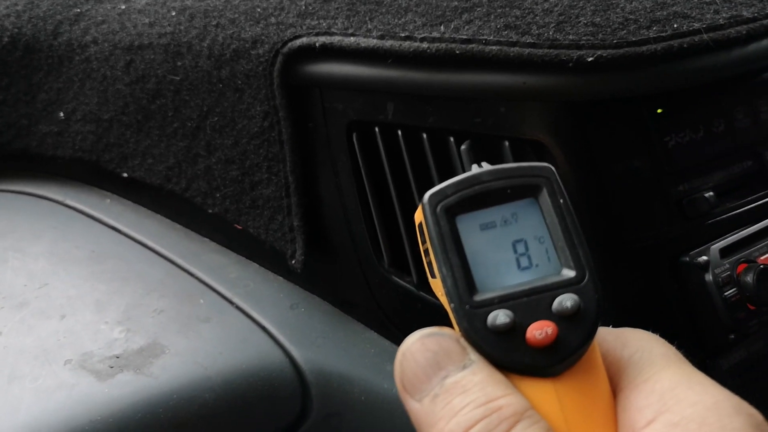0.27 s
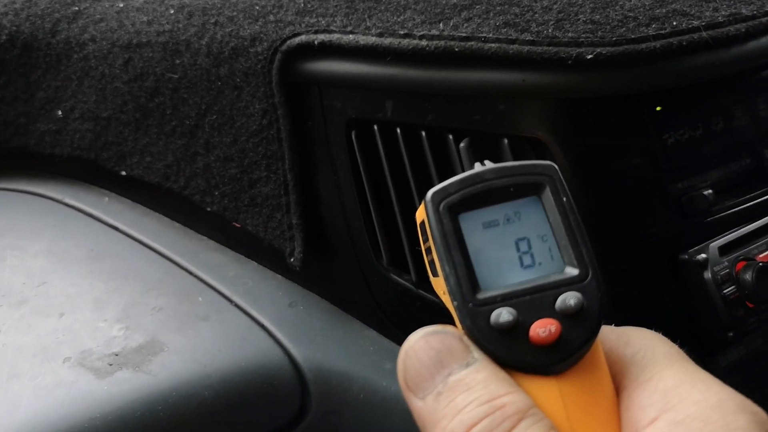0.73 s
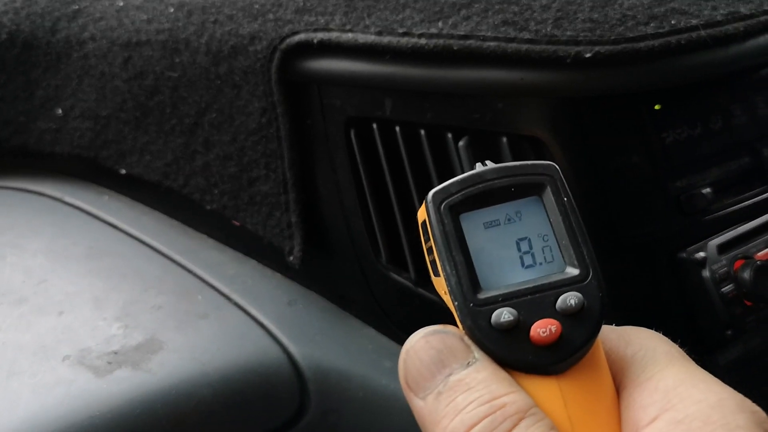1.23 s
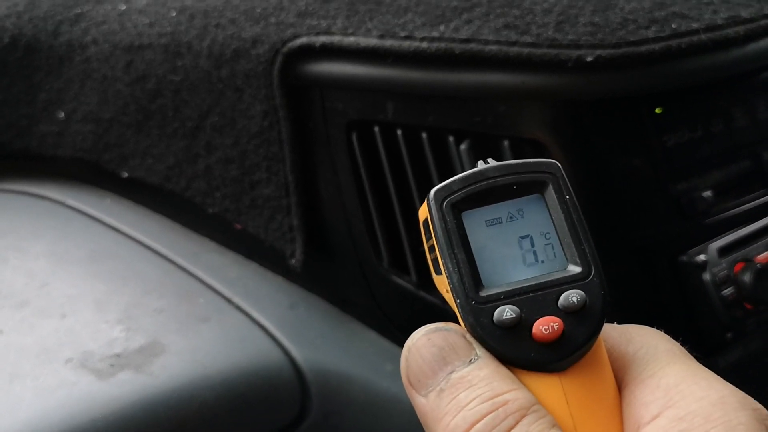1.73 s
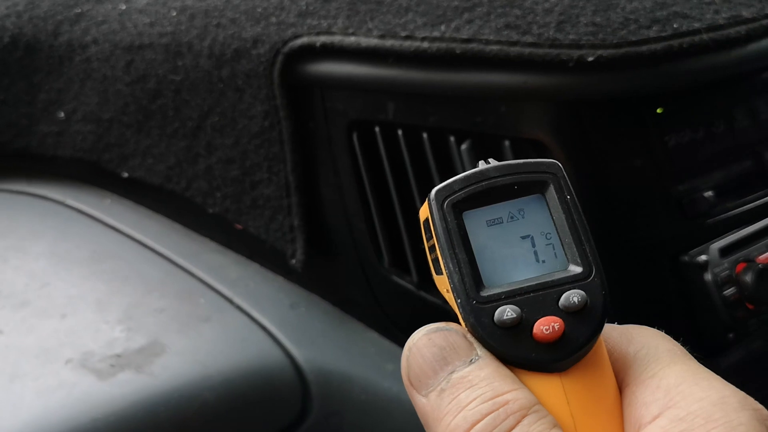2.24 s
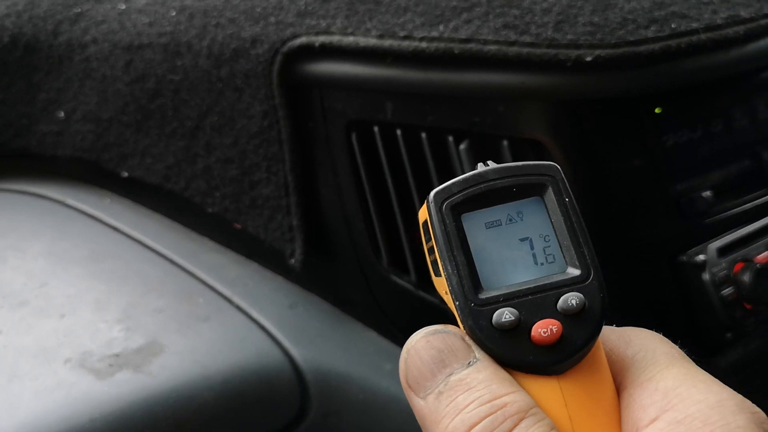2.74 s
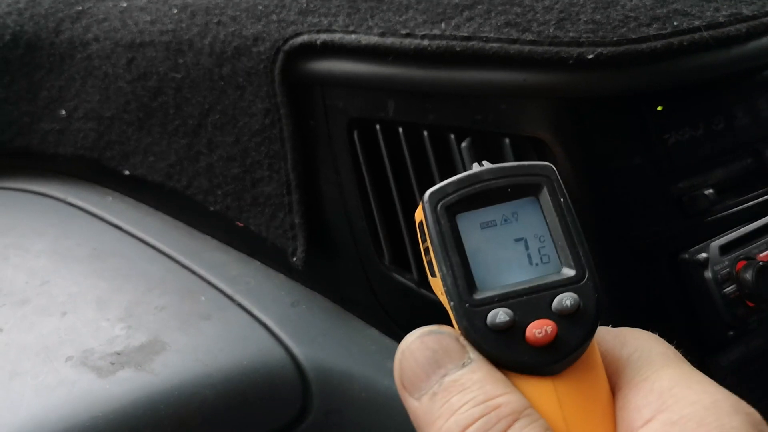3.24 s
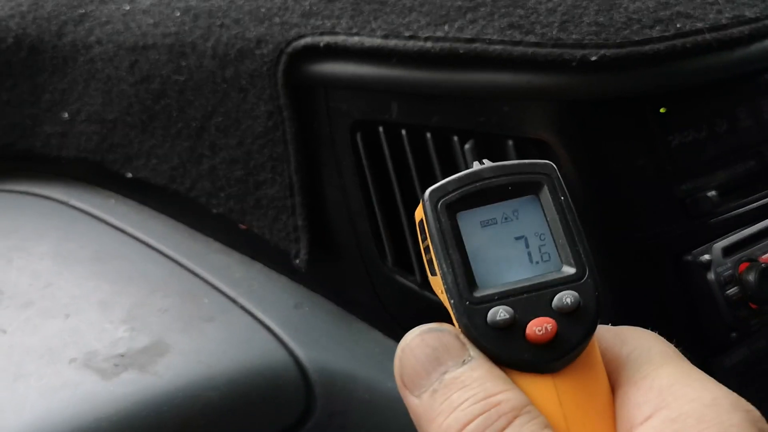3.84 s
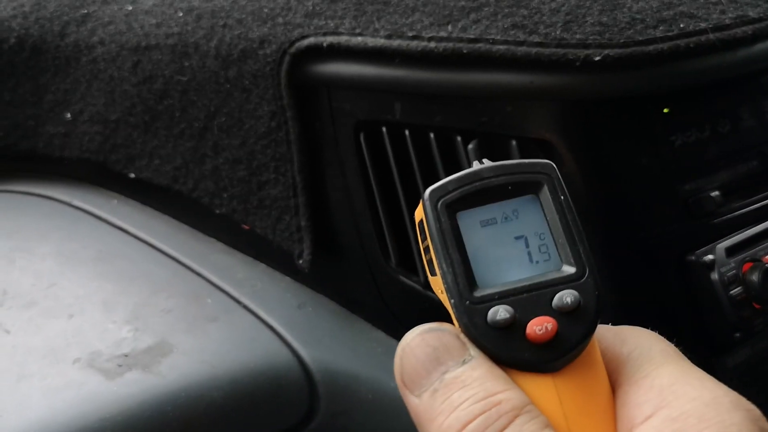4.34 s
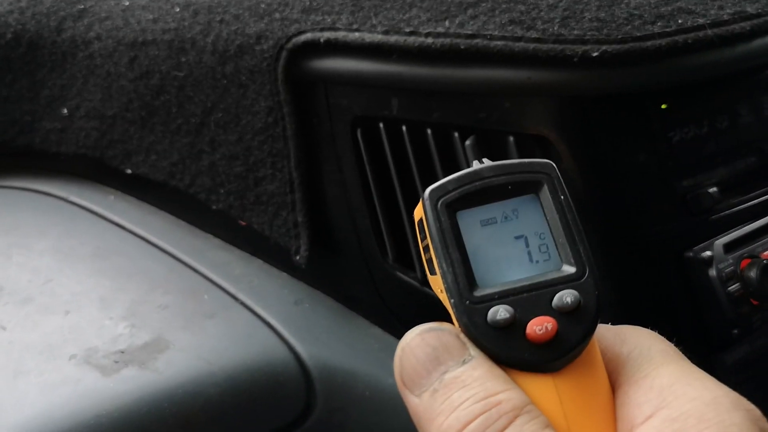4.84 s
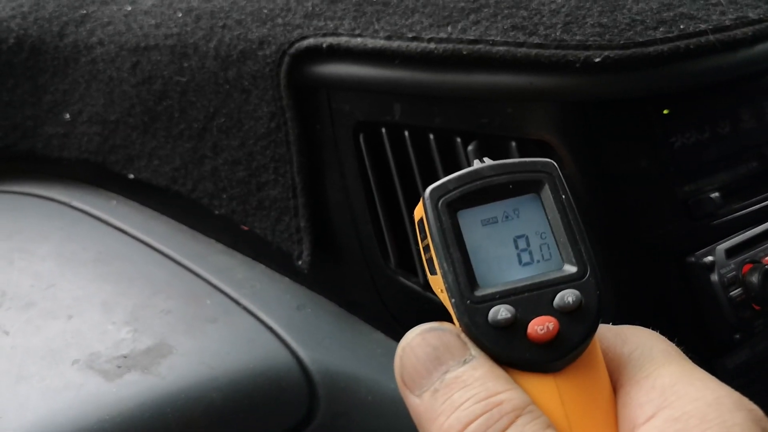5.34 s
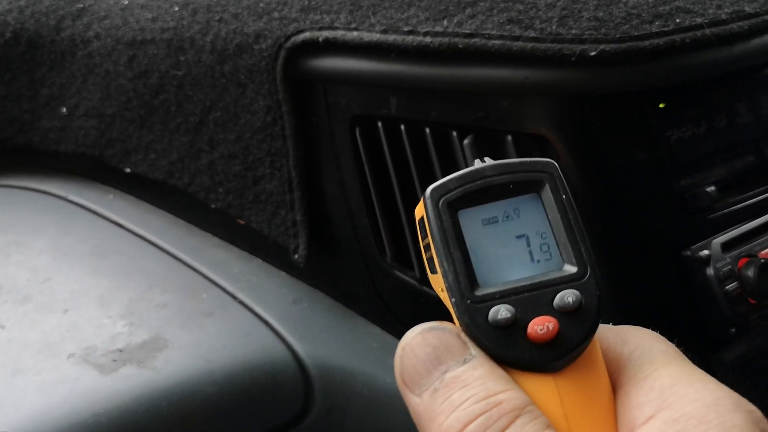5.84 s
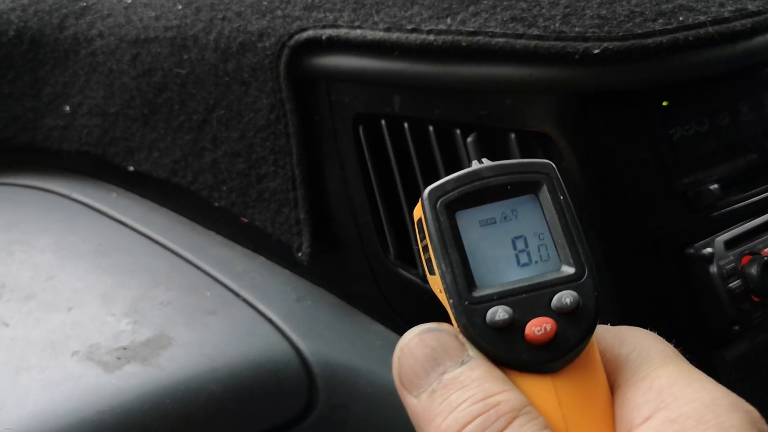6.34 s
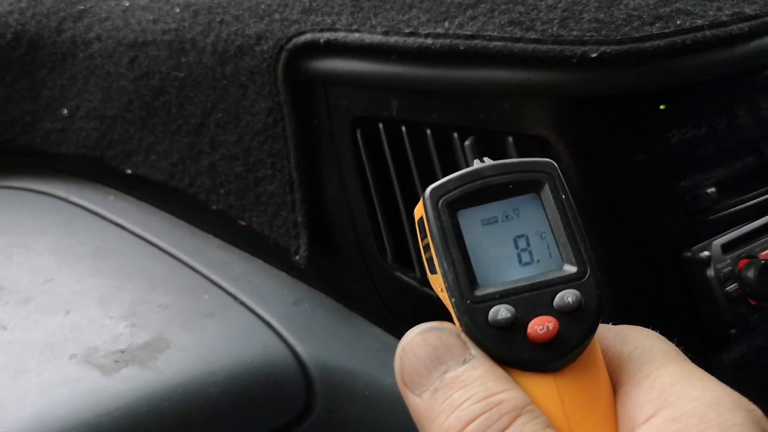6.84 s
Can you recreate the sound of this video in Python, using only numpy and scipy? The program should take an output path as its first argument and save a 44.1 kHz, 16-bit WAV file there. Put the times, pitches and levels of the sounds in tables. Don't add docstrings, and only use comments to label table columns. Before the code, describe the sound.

Close stereo pickup by a dashboard vent in a small, dry car cabin. Constant broadband airflow, slightly brighter on the left, sits over a very low engine hum and fan rumble. Irregular muffled wind thumps and flutters press on the microphone throughout, becoming denser and stronger in the second half. A very faint, thin, high whistle flickers on and off, clearest around one and a half seconds. The sound stops while air still blows.

```python
import sys
import numpy as np
from scipy import signal
from scipy.fft import rfft, irfft
from scipy.io import wavfile
from scipy.ndimage import uniform_filter1d

SR = 44100
rng = np.random.default_rng(int(sys.argv[2]) if len(sys.argv) > 2 else 0)


def bounce(signal):
    frames = np.transpose(np.atleast_2d(signal))
    limited = np.clip(frames, -1, 1)
    pcm = np.round(limited * 32767).astype(np.int16)
    wavfile.write(sys.argv[1], SR, pcm)


def amplitude_ratio(level_db):
    exponent = np.asarray(level_db, float) / 20
    return 10 ** exponent


N = 313012


def evened(x):
    return x / np.sqrt(np.mean(x ** 2) + 1e-20)


def read(points, hz):
    f, value = np.transpose(points)
    return np.interp(np.log(hz + 1), np.log(f + 1), value)


def drift(rate_hz):
    span = int(SR / rate_hz / 2)
    once = uniform_filter1d(rng.standard_normal(N), span)
    return evened(uniform_filter1d(once, span))


def white():
    return rfft(rng.standard_normal(N)) * np.sqrt(SR / 2)


def swells(peaks, calm_db):
    t = np.arange(N) / SR
    power = amplitude_ratio(calm_db) ** 2 * np.ones(N)
    for start, db, width in peaks:
        near = slice(max(int((start - 2 * width) * SR), 0), int((start + 2 * width) * SR))
        bell = np.exp(-((t[near] - start) / (0.28 * width)) ** 2)
        power[near] += amplitude_ratio(db) ** 2 * bell
    return power


# frequency [Hz], level [dB per Hz].
RUMBLE_COLOUR = [(5, -58), (15, -48.5), (30, -46), (60, -51), (120, -52), (250, -71), (400, -75),
                 (800, -100), (2500, -150)]


def rumble():
    hz = np.fft.rfftfreq(N, 1 / SR)
    return irfft(white() * amplitude_ratio(read(RUMBLE_COLOUR, hz)), N)


def blower():
    t = np.arange(N) / SR
    turn_hz, level_db = 51.1, -34
    return np.sqrt(2) * amplitude_ratio(level_db + 0.94 * drift(5.3)) * np.sin(2 * np.pi * turn_hz * t)


# time [s], firing rate [Hz].
IDLE_SPEED = [(0.0, 40.62), (0.6, 38.48), (1.0, 38.6), (1.4, 38.07), (1.6, 39.32), (1.9, 39), (2.25, 38.56),
              (2.8, 39.77), (3.2, 39.91), (4.0, 39.4), (4.4, 38.5), (4.85, 37.8), (5.3, 38.76),
              (5.6, 38.35), (6.0, 38.57), (6.3, 39.4), (6.8, 39.37), (7.1, 37.8)]
# multiple of the firing rate, level [dB], waver [dB].
ENGINE_TONES = [
    (.5, -36, 2.5),
    (.585, -33, 1.2),
    (3, -43, 3),
]


def engine():
    t = np.arange(N) / SR
    turns = np.cumsum(np.interp(t, *np.transpose(IDLE_SPEED))) / SR
    drone_db = -18 + 0.5 * drift(5.4)
    out = amplitude_ratio(drone_db) * np.sin(2 * np.pi * (turns + 0.055))
    for multiple, line_db, waver_db in ENGINE_TONES:
        phase = multiple * turns + rng.random()
        out += amplitude_ratio(line_db + waver_db * drift(1.9)) * np.sin(2 * np.pi * phase)
    return np.sqrt(2) * out


# frequency [Hz], level [dB per Hz].
HISS_LEFT_COLOUR = [(560, -75), (880, -77.5), (1850, -74), (2350, -76), (2900, -78.5), (3080, -83.5),
                    (4200, -89), (5800, -87), (6200, -92.5), (7800, -86.5), (8300, -91), (9200, -94),
                    (10900, -110), (15000, -116)]
# frequency [Hz], level [dB per Hz].
HISS_RIGHT_COLOUR = [(560, -77.5), (880, -82), (1850, -79), (2350, -80), (2800, -84), (3000, -86.5),
                     (4200, -93.5), (5800, -92), (6200, -96), (7800, -99.5), (8300, -104), (9200, -97.5),
                     (10900, -109), (15000, -116)]
# frequency [Hz], width [Hz], lift at the left port [dB], at the right port [dB].
DUCT_RESONANCES = [(468, 57, -5.5, -4), (666, 39, 9.5, 5), (975, 60, 4.5, 3.5), (1180, 36, -4, -2),
                   (1306, 153, 6, 3.5), (1500, 40, 0, 0.5), (1773, 60, 4, 3), (1950, 35, 0, 2.5),
                   (2430, 34, -3, -4.5), (2870, 72, 1, -4.5), (3790, 200, 3, 1), (5850, 90, 1, -6),
                   (12300, 410, -7.5, 7), (14600, 300, 9, -7.5)]
# frequency [Hz], width [Hz], lift left [dB], lift right [dB].
NARROW_TONES = [(1860, 12, 3, 3), (2562, 25, 4.5, 1), (3300, 8, 3, 0), (3376, 14, 6, 1)]
# frequency [Hz], likeness [0 to 1].
DIRECT_SHARE = [(400, 1), (1000, 0.2), (1500, 0.8), (2500, 0.5), (4000, 0.19), (9000, 0), (15000, 0.3)]
# delay [ms], weight.
VENT_ARRIVALS = [
    (0.635, 0.61),
    (0.02, 0.31),
    (-0.813, 0.5),
]


def hiss():
    hz = np.fft.rfftfreq(N, 1 / SR)
    left, right = 0, 0
    for delay_ms, weight in VENT_ARRIVALS:
        vent = weight * white()
        left = left + vent
        right = right + vent * np.exp(-2j * np.pi * hz * delay_ms / 1000)
    scale = np.sqrt(sum(weight ** 2 for _, weight in VENT_ARRIVALS))
    same = np.clip(read(DIRECT_SHARE, hz), 0, 1)
    diffuse = np.sqrt(1 - same ** 2) * white()
    pair = np.array([left / scale, same * right / scale + diffuse])

    colour_db = np.array([read(HISS_LEFT_COLOUR, hz), read(HISS_RIGHT_COLOUR, hz)])
    for f, width, *lift_db in DUCT_RESONANCES + NARROW_TONES:
        colour_db += np.array(lift_db)[:, None] / (1 + ((hz - f) / width) ** 2)
    air = irfft(pair * amplitude_ratio(colour_db), N)

    _, _, z = signal.stft(air, SR, nperseg=512, noverlap=384)
    patches = rng.standard_normal(z.shape[1:][::-1]).T
    patches = uniform_filter1d(patches, 8, 0)
    patches = evened(uniform_filter1d(patches, 22, 1))
    _, breathing = signal.istft(z * amplitude_ratio(0.52 * patches), SR, nperseg=512, noverlap=384)
    return breathing[:, :N]


# time [s], peak level [dB], width [s].
WHISTLE_FLARES = [(0.43, -67, .1), (0.65, -68, .1), (1.1, -68, .2), (1.54, -61, .08), (1.92, -67, .06),
                  (2.08, -70, .07), (2.45, -71, .2), (3.4, -69, 0.25), (4.33, -71, 0.16), (4.75, -69, 0.34),
                  (5.28, -69, 0.17), (5.82, -77, .2), (7.0, -75, 0.26)]


def whistle():
    hz = 9040 + 18 * drift(40.0)
    port_phase = np.array([[0], [np.pi / 2]])
    tone = np.sin(2 * np.pi * np.cumsum(hz) / SR + port_phase)
    level = np.sqrt(swells(WHISTLE_FLARES, calm_db=-75.5)) * amplitude_ratio(3.0 * drift(15.0))
    return np.sqrt(2) * level * tone * amplitude_ratio([[2.5], [-1.5]])


# frequency [Hz], level [dB per Hz].
JET_COLOUR = [(40, -0.5), (120, -2.5), (200, -6.5), (300, -12.5), (430, -21.5), (520, -34), (650, -36),
              (900, -52)]


def eddies(peaks, calm_db, low_hz, high_hz, lag_ms, same):
    hz, t = np.fft.rfftfreq(N, 1 / SR), np.arange(N) / SR
    low_side = 1 + (low_hz / (hz + 1)) ** 8
    high_side = 1 + (hz / high_hz) ** 8
    shape = amplitude_ratio(read(JET_COLOUR, hz)) / np.sqrt(low_side * high_side)
    strength = np.sqrt(swells(peaks, calm_db))

    def lumps():
        x = evened(irfft(white() * shape, N))
        filled = x / uniform_filter1d(x ** 2, 1100) ** 0.33
        return evened(filled) * strength

    right = lumps()
    left = same * right + np.sqrt(1 - same ** 2) * lumps()
    return np.array([np.interp(t - lag_ms / 1000, t, left), right])


# time [s], thud [dB], flutter above the thud [dB], width [s].
GUST_HITS = [(0.013, -20.5, -13, 0.082), (0.059, -22, -10, 0.026), (0.445, -21.5, -16, 0.04),
             (0.633, -31.5, 2, 0.022), (0.879, -31.5, -13, 0.062), (1.088, -34, 1, 0.037),
             (1.223, -27.5, -8, 0.088), (1.579, -23, -22, 0.024), (1.812, -22, -15, 0.035),
             (1.904, -20.5, -14, 0.051), (2.009, -32, -2, 0.019), (2.151, -21, -18, 0.044),
             (2.862, -28, -27, 0.092), (3.099, -24, -24, 0.061), (3.284, -29, -18, 0.047),
             (3.873, -27.5, -29, 0.11), (4.224, -30, 1.5, 0.052), (4.438, -23, -10, 0.093),
             (4.555, -27, -17, 0.033), (4.62, -27.5, 2.5, 0.023), (4.737, -19, -11.5, 0.029),
             (4.869, -25, -9, 0.043), (5.028, -22.5, -14.5, 0.11), (5.276, -22.5, -15, 0.028),
             (5.458, -19, -8.5, 0.073), (5.793, -29.5, -5, 0.081), (6.077, -25.5, 1.5, 0.031),
             (6.228, -23.5, -5, 0.092), (6.72, -20, -15, 0.16), (6.988, -20, -20, 0.019)]
# time [s], boom level [dB].
SLAPS = [(0.198, -24), (0.375, -25), (0.443, -21.5), (0.633, -20.5), (0.78, -21.5), (1.315, -24),
         (1.579, -18), (1.812, -23.5), (1.901, -28), (2.009, -16), (2.411, -30), (2.479, -22), (2.64, -25),
         (2.862, -22), (3.093, -14.5), (3.359, -20.5), (3.586, -29), (3.759, -26), (4.1, -32), (4.436, -21),
         (4.554, -16.5), (4.63, -21), (4.74, -19), (5.13, -21), (5.276, -11), (5.655, -17.5),
         (5.986, -15.5), (6.076, -17), (7.057, -18.5)]
# time [s], peak level [dB].
SHARP_FRONTS = [(1.898, -29.5), (4.223, -37), (4.48, -28), (4.993, -28), (5.273, -25.5), (5.42, -27.5),
                (5.456, -28), (6.063, -40), (6.225, -48), (6.689, -34), (6.857, -33)]
# time [s], level [dB].
JET_LEAN = [(0.0, -28.5), (0.7, -30.5), (1.0, -29), (1.4, -27.5), (1.75, -32), (2.1, -30.5), (2.6, -30),
            (2.9, -28.5), (3.5, -31.5), (4.0, -30), (4.6, -28.5), (5.2, -26), (5.8, -26.5), (6.0, -28),
            (6.42, -32), (6.85, -26), (7.1, -29.5)]


def buffets():
    large_db = np.interp(np.arange(N) / SR, *np.transpose(JET_LEAN))
    small_db = large_db - 6.5
    flap = drift(24.0)
    slap_s = 0.024

    booms = [(s, db - 10.5, width) for s, db, _, width in GUST_HITS]
    booms += [(s, db, slap_s) for s, db in SLAPS]
    thuds = [(s, db, width) for s, db, _, width in GUST_HITS]
    thuds += [(s, db - 9.5, slap_s) for s, db in SLAPS]
    flutters = [(s, db + fine_db, width) for s, db, fine_db, width in GUST_HITS]
    fronts = [(s, db, 0.0081) for s, db in SHARP_FRONTS]

    boom_db = large_db + 0.2 + 3.13 * flap
    thud_db = small_db - 3.5 + 3.7 * flap + 2.2 * drift(22.0)
    flutter_db = small_db - 8.5 + 3.55 * flap + 2.1 * drift(22.0)
    boom = eddies(booms, boom_db, low_hz=46.5, high_hz=132.7, lag_ms=0.43, same=0.82)
    thud = eddies(thuds, thud_db, low_hz=150, high_hz=272.5, lag_ms=0.95, same=1)
    flutter = eddies(flutters, flutter_db, low_hz=283.5, high_hz=598, lag_ms=0.9, same=0.53)
    spit = eddies(fronts, small_db - 32, low_hz=483, high_hz=1100, lag_ms=1, same=0)

    out = boom + thud * amplitude_ratio([[-0.6], [0.6]])
    out += flutter * amplitude_ratio([[-2.0], [1.5]])
    return out + spit * amplitude_ratio([[-9.0], [1.5]])


def scene():
    cabin = (rumble() + blower() + engine()) * amplitude_ratio([[-0.15], [0.15]])
    return cabin + hiss() + whistle() + buffets()


def top_cut(x):
    return signal.sosfilt(signal.butter(12, 15060, fs=SR, output="sos"), x)


def record(dry):
    return top_cut(dry)


dry = scene()
out = record(dry)
bounce(out)
```